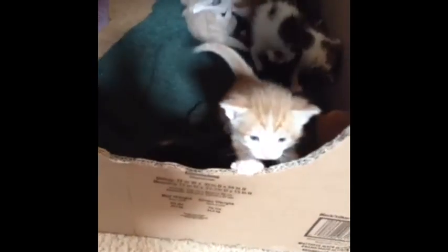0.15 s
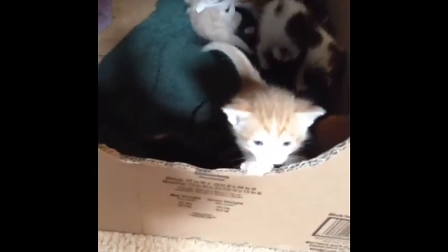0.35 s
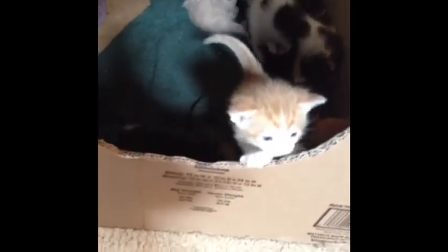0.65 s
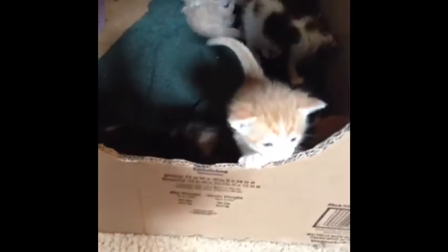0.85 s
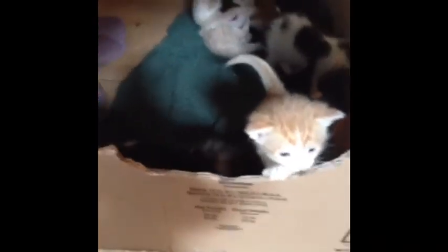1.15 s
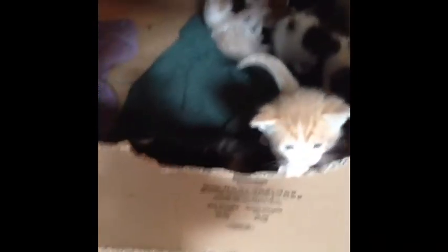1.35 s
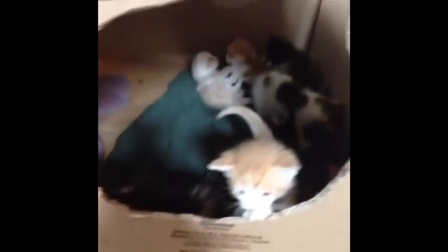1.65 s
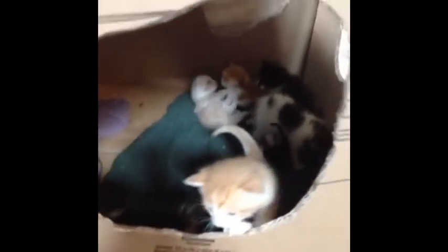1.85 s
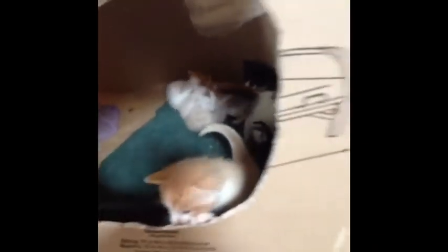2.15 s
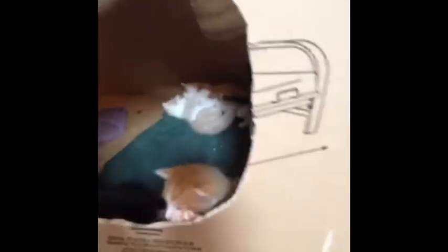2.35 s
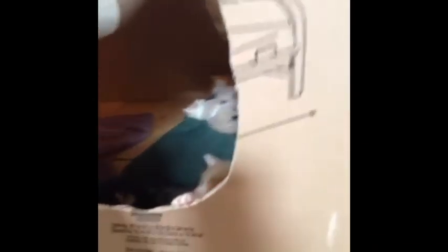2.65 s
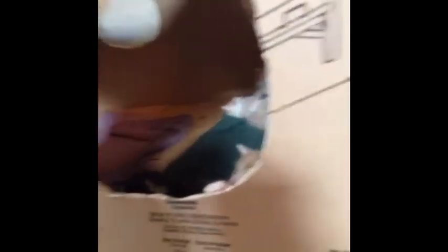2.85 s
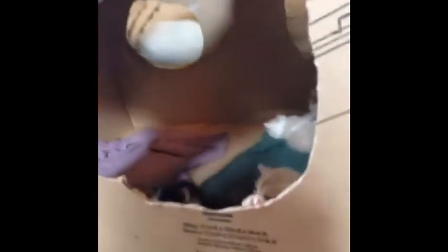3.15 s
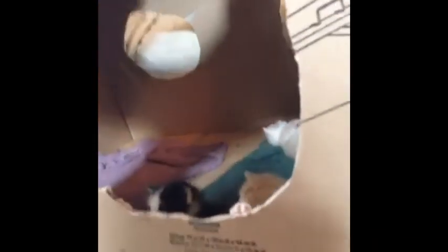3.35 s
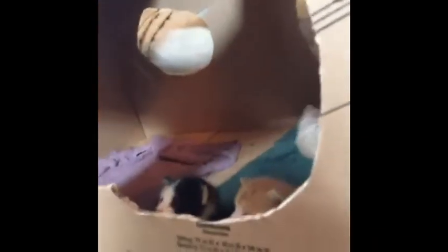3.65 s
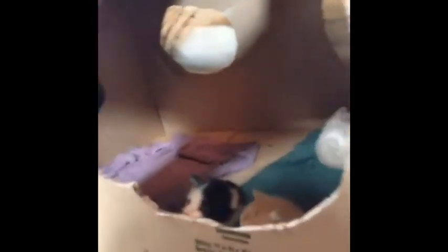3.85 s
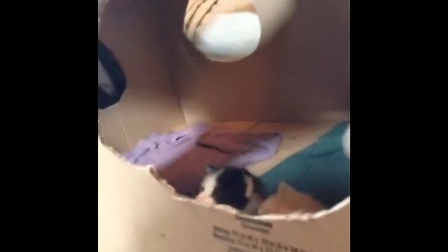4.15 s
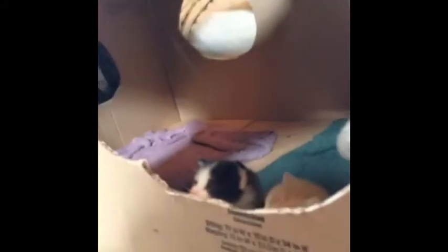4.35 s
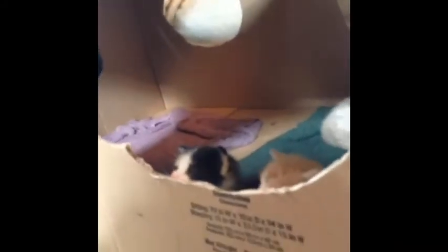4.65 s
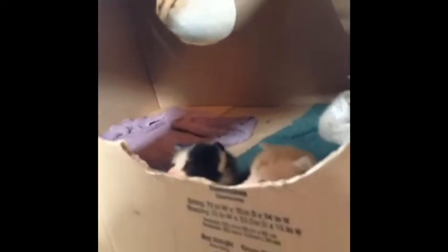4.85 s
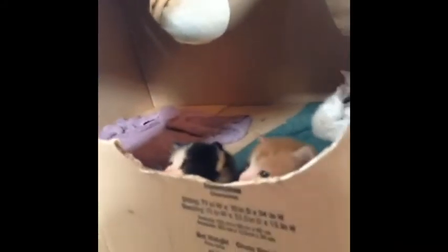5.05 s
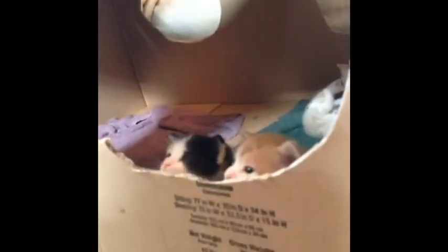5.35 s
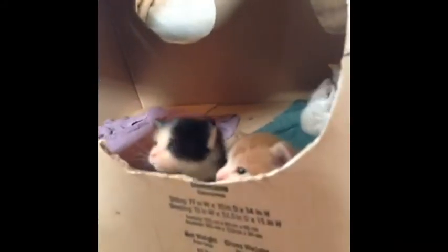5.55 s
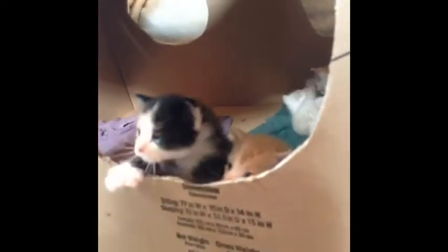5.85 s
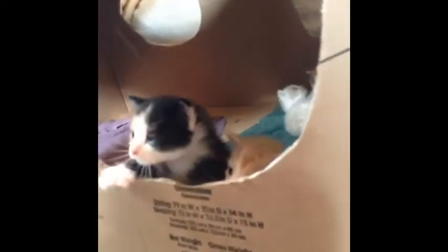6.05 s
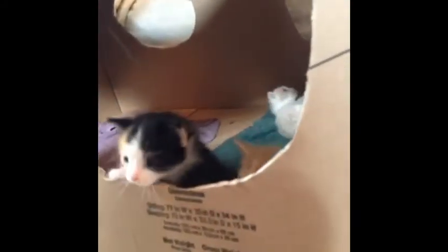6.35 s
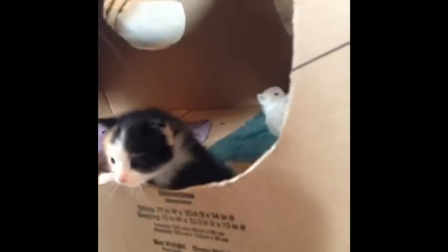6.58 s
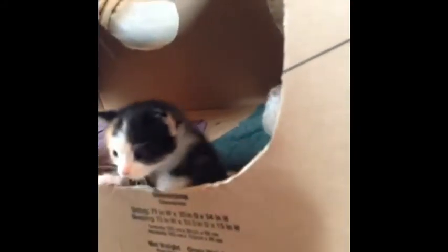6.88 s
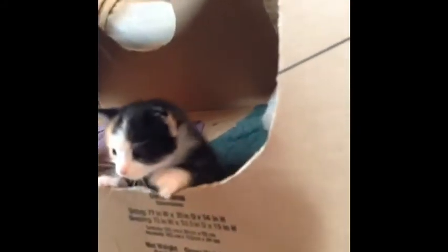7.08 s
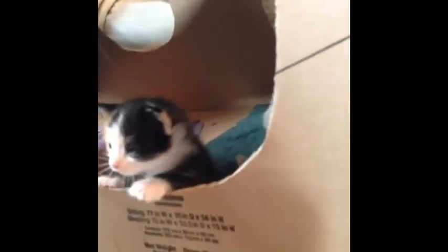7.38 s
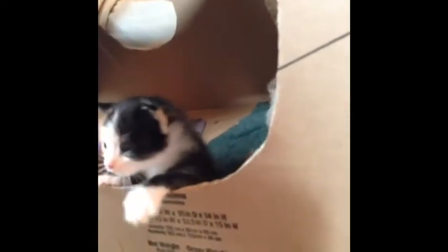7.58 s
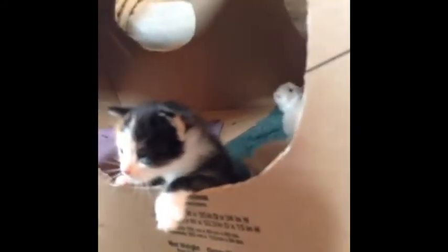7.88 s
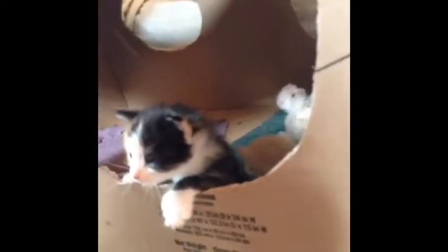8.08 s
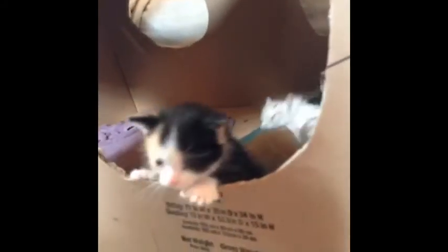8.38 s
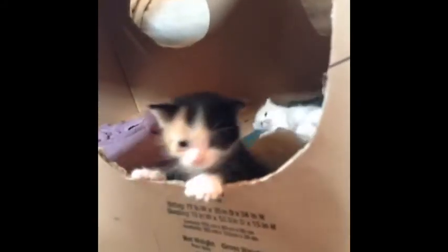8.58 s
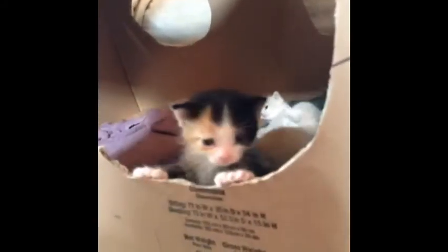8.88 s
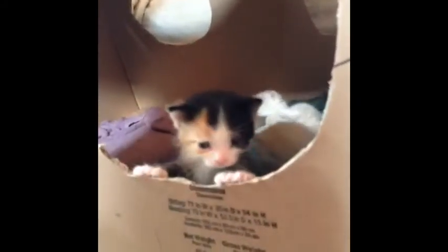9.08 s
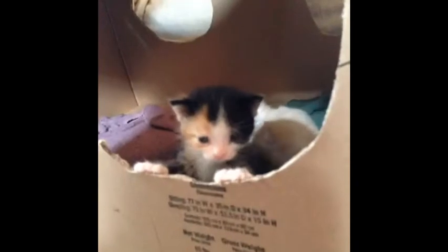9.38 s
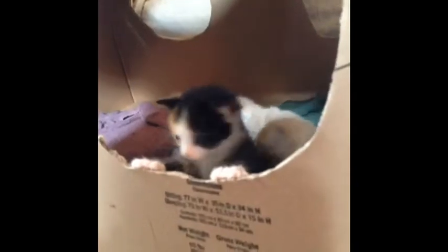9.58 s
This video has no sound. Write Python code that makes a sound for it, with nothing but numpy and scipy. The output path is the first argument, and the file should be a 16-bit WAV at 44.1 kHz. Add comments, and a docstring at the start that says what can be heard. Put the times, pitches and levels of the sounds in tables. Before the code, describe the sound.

Kittens clamber inside a cardboard box, claws scratching and ticking on the rim, with soft hollow bumps and two brief hissing slides.

```python
"""A faint stirring in a quiet room, then a close, dry scratch: kittens clamber about in a cardboard box.
Claws drag over the fibres, snap free, and knock and pluck at the rim; fur brushes past and paws bump
the walls. Twice something like a hand slides along the card, its hiss coloured by the air gap beneath.
Near the end a claw skips over the corrugations. The panels ring and the hollow of the box booms."""
import sys
import numpy as np
from scipy import signal
from scipy.fft import rfft, irfft, next_fast_len
from scipy.io import wavfile
from scipy.ndimage import uniform_filter1d, map_coordinates

SR = 44100
rng = np.random.default_rng(int(sys.argv[2]) if len(sys.argv) > 2 else 0)


def bounce(signal):
    """Save signal as a 16-bit WAV file at the path given by the first command-line argument."""
    frames = np.transpose(np.atleast_2d(signal))
    limited = np.clip(frames, -1, 1)
    pcm = np.round(limited * 32767).astype(np.int16)
    wavfile.write(sys.argv[1], SR, pcm)


N = 428652

# room tone and hiss: freq_hz, gain_db
ROOM_EQ = [(15, -72), (25, -27.5), (62, -16.5), (125, -4.5), (233, -1), (260, -9.5), (297, -9), (378, -6),
           (537, -4), (684, -6.5), (895, -8.5), (1050, -10.5), (2010, -11.5), (2360, -10), (5580, -10),
           (14300, -12.5), (15500, -16.5)]
# bodies stirring on the bedding; only the swing about the mean counts: time_s, stir_db
STIRRING = [(0.0, -74.5), (0.54, -78), (1.46, -70.5), (1.65, -72.5), (2.0, -76), (2.33, -69.5), (2.72, -71),
            (3.38, -75.5), (4.36, -69.5), (4.84, -67), (4.98, -73.5), (5.2, -70), (5.38, -64.5),
            (5.85, -69.5), (7.04, -69.5), (7.31, -68), (7.85, -72.5), (9.15, -67), (9.36, -71), (9.72, -72)]
# boom of the hollow box: freq_hz, gain_db
HOLLOW_EQ = [(40, -57.5), (95, -19), (135, -4), (168, 3.5), (235, -6), (290, -2.5), (360, -8.5), (430, -8),
             (600, -18), (1500, -65.5)]
# bending resonances of the panels: pitch_hz, width_hz, gain_db
PANEL_MODES = [(319, 78, 3), (434, 100, -1), (716, 45, 1.5), (946, 153, 1), (1208, 150, -4.5),
               (1970, 140, -6)]
# grit of a claw on fibres: freq_hz, gain_db
GRIT_EQ = [(500, -32), (1150, -1), (1480, -1.5), (1820, 4), (2250, 1), (3100, 3.5), (3750, 2.5), (4700, 2),
           (7500, -1.5), (10000, -6), (15000, -13)]
# claw strokes: start_s, length_s, grit_db, panel_db, hollow_db, attack_softness (0-1)
SCRATCH_CUES = [(.158, 0.016, -42.5, -49, -59, 0.05), (0.786, 0.037, -60, -68.5, -78, 0.9),
                (.928, 0.067, -56, -63.5, -66, 0.65), (1.014, 0.032, -63.5, -69, -63.5, 0.14),
                (1.157, 0.057, -60, -66.5, -68, 0.06), (1.257, 0.052, -63.5, -66, -61, 0.04),
                (1.361, 0.0693, -56, -63.5, -59.5, 0.87), (1.543, 0.0502, -54.5, -60.5, -65.5, 0.13),
                (1.63, 0.049, -53.5, -59.5, -66.5, 0.98), (1.733, 0.044, -62.5, -68.5, -74, 0.4),
                (2.064, .04, -70, -65, -62, 0.2), (3.552, 0.083, -59, -55.5, -58.5, 0.53),
                (4.35, 0.036, -66, -65.5, -62.5, .5), (4.418, 0.041, -58.5, -58.5, -57.5, 0.75),
                (4.536, 0.033, -63, -65, -64, 0.49), (4.619, 0.048, -60, -64, -62, 0.8),
                (4.698, 0.064, -63, -65, -64.5, 0.4), (4.768, 0.033, -63.5, -66, -61, 0.3),
                (4.802, 0.068, -62.5, -62, -59.5, 0.51), (4.953, .08, -60, -61.5, -61, 0.1),
                (5.139, 0.052, -55, -57, -58, 0.26), (5.268, 0.023, -67, -61.5, -64, .4),
                (5.331, 0.033, -63, -63, -61, 0.1), (5.36, 0.027, -53, -53, -58, 0),
                (5.378, .028, -56, -55, -58, .1), (5.422, .022, -63, -59, -56.5, .4),
                (5.653, 0.026, -67.5, -68, -63, 0.4), (5.451, 0.0192, -65.5, -55, -59, .03),
                (5.472, 0.03, -59, -52, -64, .45), (5.589, 0.014, -60, -53, -56.5, 0.06),
                (6.097, 0.022, -60, -60.5, -65, 0.1), (6.41, 0.06, -62, -69.5, -71, 0.4),
                (6.235, 0.034, -63, -66, -68, .3), (6.692, 0.013, -52, -60, -68, 0.1),
                (6.705, 0.021, -62, -65.5, -70, 0.1), (6.762, 0.017, -59, -66, -70, 0.3),
                (6.796, .014, -63, -70, -70, 0.4), (7.185, 0.00507, -53.5, -58, -59, .2),
                (7.258, 0.018, -59, -61, -59, .6), (7.313, 0.0076, -54, -56, -64, 0.1),
                (7.339, 0.017, -58, -59, -61, 0.05), (7.362, 0.017, -59, -60, -59, 0.2),
                (7.389, 0.014, -52.5, -51, -56, 0.5), (8.9532, 0.017, -50.5, -54.5, -67, 0.24),
                (8.518, .012, -66, -64, -71, .3), (9.04, 0.14, -71.5, -66, -69, 0.06),
                (9.198, 0.013, -65, -62, -61, .2), (9.232, .026, -72, -65, -62, 0.6)]
# fur against the rim: start_s, length_s, level_db
BRUSH_CUES = [(0.181, 0.084, -66), (5.879, 0.22, -67.5), (6.175, 0.091, -62.5), (6.553, .14, -64.5),
              (7.241, 0.3, -65), (7.878, 0.122, -64.5), (8.173, 0.16, -66), (8.489, 0.28, -62.5),
              (9.258, .036, -63), (9.318, 0.044, -60.5)]
# airy hiss of fur: freq_hz, gain_db
FUR_EQ = [(800, -4), (2500, -7.5), (5500, 0), (9000, -1.5), (15000, -4)]
# paws on the walls: start_s, level_db, hardness_hz
BUMP_CUES = [(.704, -49, 300), (1.269, -43, 352), (1.613, -50, 400), (2.38, -45.5, 300), (2.42, -45.5, 300),
             (2.478, -49, 300), (2.512, -50.5, 250), (2.545, -56, 300), (2.866, -56, 500),
             (2.997, -57.5, 500), (3.065, -57, 500), (3.650, -29, 620), (3.669, -41, 500),
             (4.221, -47, 250), (4.405, -54, 300), (4.488, -52, 300), (4.685, -55, 300), (4.76, -50, 350),
             (5.176, -50, 400), (5.485, -49.5, 450), (6.231, -47.5, 253), (6.655, -53.5, 300),
             (7.187, -49, 250), (7.394, -34, 195), (8.475, -54, 300), (8.80, -53, 250), (9.396, -43, 290),
             (9.405, -39, 230)]
# ring of the bumped box: pitch_hz, gain_db, t60_s
BOX_MODES = [(171.1, -1, 0.155), (197.6, -7.5, 0.12), (285, 1, 0.095), (427, 0, 0.037), (568, -7, 0.05),
             (707, -3, 0.037), (850, -0.5, 0.03), (1770, -12.5, .015)]
# claws snapping free: start_s, snap_peak_db, centre_hz, panel_relative_db
TICK_CUES = [(0.932, -42.5, 3940, -21), (1.1587, -43.5, 4340, -25), (2.4049, -31, 4500, -18),
             (3.6497, -31.5, 2100, 2.5), (3.7692, -38.5, 2600, -34), (4.002, -34, 3600, -35),
             (4.6275, -46, 4600, -8), (4.643, -45, 5000, -10), (4.7703, -42, 4500, -14),
             (4.955, -43, 3820, -18.5), (5.3955, -46, 5500, -5), (5.4853, -27.5, 7200, -29),
             (6.0417, -39.5, 4680, -8), (6.2423, -40, 4100, -16), (6.4459, -41, 3000, -25),
             (6.617, -39.5, 6160, -40), (7.061, -45.5, 1900, -13), (7.2524, -38.5, 5400, -16),
             (7.2915, -38, 6890, -15), (7.3132, -33.5, 5200, -9), (7.3395, -26, 7300, -18),
             (7.3915, -35.5, 1990, -10), (7.397, -34.5, 1800, -8), (7.8809, -40.5, 2900, -22),
             (8.5391, -36, 4500, -17), (8.6089, -41, 3800, -12), (8.765, -48.5, 1480, -10),
             (9.2663, -35.5, 4000, -15.5), (9.3183, -39, 3600, -9.5)]
# fader moves ahead of the trims, a list per slide: time_s, friction_db, fizz_relative_db, panel_db, hollow_db
SLIDE_FADERS = [
    [(2.06, -79, -13.5, -66, -68), (2.11, -52.5, -0.5, -72, -63), (2.164, -47.5, -2, -75.5, -62),
     (2.192, -46, -7, -75, -78), (2.258, -38, -10, -65, -74), (2.306, -42.5, -15, -61.5, -57),
     (2.34, -42, -11, -61, -64), (2.414, -41.5, -10, -55.5, -56), (2.446, -39, -8, -60, -52),
     (2.468, -37, -4, -55, -55), (2.494, -46.5, -7, -55, -54), (2.53, -85, -10, -72, -67)],
    [(3.78, -70, -4, -71, -76.5), (3.82, -59, 0, -79, -69), (3.872, -56, -4, -67, -76),
     (3.904, -37.5, -6, -70, -75), (3.952, -42, -7.5, -57, -78), (3.99, -45.5, -12, -64, -68),
     (4.036, -42, -15, -69, -69), (4.046, -36.5, -11, -72, -67), (4.09, -34.5, -4, -70, -63),
     (4.122, -33, -1.5, -63, -67), (4.16, -39.5, -8.5, -53.5, -59), (4.246, -58.5, -3, -56.5, -51.5),
     (4.305, -66, -4, -60.5, -59), (4.335, -74.5, -5.5, -70, -68)],
]
# skin rubbing on card: freq_hz, gain_db
FRICTION_EQ = [(400, -31), (1200, -2), (1500, -1), (2000, 1), (2600, 2), (3500, 2.5), (5000, 2),
               (6200, -0.5), (8300, -6), (9500, -22), (15000, -20)]
# fizzy top of the rub: freq_hz, gain_db
FIZZ_EQ = [(4000, -41), (7000, -5), (8300, 0), (9200, 1), (10300, -3), (11700, -7.5), (13000, -12.5),
           (15000, -15)]
# pitch of the air gap, rising as it shortens, a curve per slide: time_s, pitch_hz
GAP_GLIDES = [
    [(2.10, 1270), (2.16, 1360), (2.21, 1520), (2.26, 1810), (2.30, 2050), (2.345, 2560), (2.41, 3030),
     (2.445, 3750), (2.49, 4700)],
    [(3.80, 1080), (3.89, 1250), (3.95, 1480), (4.00, 1630), (4.055, 1800), (4.075, 1160), (4.11, 1150),
     (4.145, 1073), (4.30, 1130)],
]
# lowest band the gap passes, a curve per slide: time_s, band_hz
GAP_LOW_BANDS = [
    [(2.12, 1900), (2.175, 2350), (2.225, 1680), (2.32, 1660), (2.46, 1310)],
    [(3.89, 1750), (3.965, 1620), (3.992, 2950), (4.033, 3220), (4.048, 2390), (4.135, 2150), (4.15, 1240),
     (4.3, 1110)],
]
# claws and paws landing on the cut rim: start_s, level_db
KNOCK_CUES = [(2.768, -59), (2.867, -54.5), (3.035, -60), (3.066, -53.5), (4.438, -52), (4.627, -53.5),
              (5.454, -51), (5.478, -51), (3.6507, -37), (7.1857, -53), (7.3132, -41.5), (7.3396, -40.5)]
# ring of the stiff rim: pitch_hz, gain_db, t60_s
RIM_MODES = [(296, -5.5, .05), (441, 1, 0.033), (554, -1.5, .028), (827, -3.5, 0.043), (980, -1.5, .025),
             (1150, -4.5, 0.022)]
# claws plucking a stiff edge: start_s, peak_db, pitch_hz
PLUCK_CUES = [(3.6499, -27.5, 6600), (5.1645, -38.5, 6700), (6.418, -45, 5500), (6.4295, -47, 5600),
              (6.4456, -32.5, 6000), (6.451, -45, 5400), (6.4583, -37, 5050), (6.4635, -44, 5300),
              (7.3135, -41, 4500), (7.3405, -35.5, 4480)]


def amp(db):
    """Decibels to gain."""
    return 10 ** (np.asarray(db) / 20)


def unit(x):
    """x at rms 1."""
    return x / np.sqrt(np.mean(np.abs(x) ** 2) + 1e-20)


def eq(points, hz):
    """Gain of an EQ curve, drawn on a log frequency axis."""
    freq_hz, gain_db = np.transpose(points)
    return amp(np.interp(np.log(hz + 1), np.log(freq_hz), gain_db))


def curves(rows, t):
    """Each column after the time, read at the times t."""
    time_s, *columns = np.transpose(rows)
    return [np.interp(t, time_s, column) for column in columns]


def wobble(rate, n):
    """A smooth random curve, rate knots a second."""
    return map_coordinates(rng.standard_normal(int(n * rate / SR) + 4), [np.arange(n) * rate / SR])


def add(track, start_s, x):
    """Mix x into the track at start_s."""
    part = track[max(round(start_s * SR), 0):][:len(x)]
    part += x[:len(part)]


def colour(x, gain, tail=4096):
    """Minimum-phase filter of unit energy, shaped by gain(hz); keeps the ring-out."""
    size = 2 * next_fast_len((len(x) + tail) // 2)
    cepstrum = irfft(np.log(unit(gain(np.fft.rfftfreq(size, 1 / SR))) + 1e-6))
    cepstrum[1:size // 2] *= 2
    cepstrum[size // 2 + 1:] = 0
    return irfft(rfft(x, size) * np.exp(rfft(cepstrum)))


def resonance(hz, centre, width):
    """Gain of one resonance, 1 at its centre."""
    return hz * width / np.hypot(centre ** 2 - hz ** 2, hz * width)


def room(level_db=-65):
    """A steady bed of low room tone and hiss."""
    return amp(level_db) * colour(rng.standard_normal(N), lambda hz: eq(ROOM_EQ, hz))[:N]


def grains(n, rate, spread_db):
    """Fibres catching and letting go: random impulses of uneven size, rms 1."""
    caught = rng.random(n) < rate / SR
    return unit(caught * rng.choice([-1, 1], n) * amp(spread_db * np.clip(rng.standard_normal(n), -2, 2)))


def hollow(hz):
    """Gain of the whole box booming."""
    return eq(HOLLOW_EQ, hz)


def panel(hz):
    """Gain of the cardboard's bending resonances, with the mids forward."""
    power = sum((amp(db) * resonance(hz, centre, width)) ** 2 for centre, width, db in PANEL_MODES)
    tone = eq([(150, -25.5), (500, -3), (1200, 2.0), (1500, -5.0), (2000, -8.5), (4000, -7.5)], hz)
    return np.sqrt(power) * tone


def shuffle(base_db=-70, swing=1.18):
    """Small bodies shift on the bedding and keep the box murmuring with faint crackles."""
    stir_db, = curves(STIRRING, np.arange(N) / SR)
    fidget = amp(3 * wobble(14, N))
    crackle = amp(swing * (stir_db - stir_db.mean())) * fidget * grains(N, rate=700, spread_db=4)
    body = lambda hz: (amp(-3) * unit(hollow(hz)) + amp(-13.5) * unit(panel(hz))
                       + amp(-10) * unit(eq(GRIT_EQ, hz)))
    return amp(base_db) * colour(crackle, body)[:N]


def spot(depth_db, spacing_hz):
    """Every spot of the card has its own uneven resonances: a random EQ curve."""
    knots = depth_db * rng.standard_normal(int(SR / 2 / spacing_hz) + 4)
    return lambda hz: amp(map_coordinates(knots, [hz / spacing_hz], order=1))


def snags(n, per_s=220, decay_s=0.00097, spike_db=3):
    """The claw catches and tears free: brief random spikes on top of unity gain."""
    caught = rng.random(n) < per_s / SR
    return 1 + amp(spike_db) * signal.lfilter([1], [1, -np.exp(-1 / (decay_s * SR))], caught)


def scratches(strokes, rasp_hz=4570, rasp_scatter=0.054, rasp_gain=0.52):
    """A claw drags in jerks over the fibres, rasping and shaking the panel and the box."""
    out = np.zeros(N)
    for start_s, length_s, grit_db, panel_db, hollow_db, softness in strokes:
        n = int(length_s * SR)
        progress = np.arange(n) / n
        envelope = progress ** softness * (1 - progress) ** 0.83
        jerks = amp(2.5 * wobble(254, n)) * snags(n)
        drag = unit(envelope * jerks * grains(n, rate=5500, spread_db=4))
        card = spot(depth_db=3.2, spacing_hz=200)
        peak_hz = rasp_hz * np.exp(rasp_scatter * rng.standard_normal())
        bite = lambda hz: 1 + rasp_gain * resonance(hz, peak_hz, 0.12 * peak_hz)
        rasp = colour(drag, lambda hz: card(hz) * eq(GRIT_EQ, hz) * bite(hz))
        add(out, start_s, amp(grit_db) * rasp + amp(panel_db) * colour(drag, panel))
        add(out, start_s, amp(hollow_db) * colour(drag, hollow))
    return out


def brushes():
    """Fur grazes the rim in a smooth, airy swell."""
    out = np.zeros(N)
    for start_s, length_s, level_db in BRUSH_CUES:
        n = int(length_s * SR)
        swell = unit(np.sqrt(np.abs(np.hanning(n)))) * rng.standard_normal(n)
        add(out, start_s, amp(level_db) * colour(swell, lambda hz: eq(FUR_EQ, hz)))
    return out


def bumps(crumple_db=-3.5, crumple_t60=0.07):
    """A padded paw rings the box; the softer the contact, the fewer high modes."""
    out, t = np.zeros(N), np.arange(SR // 3) / SR
    for start_s, level_db, hardness_hz in BUMP_CUES:
        padded = lambda hz: 1 / np.hypot(1, (hz / hardness_hz) ** 2)
        scatter_db = rng.normal(0, 1.5, len(BOX_MODES))
        ring = sum(amp(db + extra_db - 60 * t / t60) * padded(hz) * np.sin(2 * np.pi * hz * t)
                   for (hz, db, t60), extra_db in zip(BOX_MODES, scatter_db))
        muffled = lambda hz: resonance(hz, hardness_hz / 2, hardness_hz) * padded(hz)
        crumple = colour(rng.standard_normal(len(t)), muffled)[:len(t)]
        crumple *= amp(crumple_db - 60 * t / crumple_t60)
        attack = 1 - np.exp(-t * hardness_hz)  # the pad flattens gradually
        add(out, start_s, amp(level_db) * attack * (ring + crumple))
    return out


def low_cut(x, cutoff_hz=138):
    """A low cut takes the deep bass out of the bumps."""
    return signal.sosfilt(signal.butter(4, cutoff_hz, "high", fs=SR, output="sos"), x)


def ticks(t60=0.006, ring_db=-30, ring_t60=0.053, dull_hz=10500):
    """A claw pops free of the fibres: a dry snap with a brief ring in the card."""
    out, t = np.zeros(N), np.arange(SR // 20) / SR
    for start_s, peak_db, centre_hz, panel_db in TICK_CUES:
        burst = rng.standard_normal(len(t)) * (amp(-60 * t / t60) + amp(ring_db - 60 * t / ring_t60))
        card = spot(depth_db=2, spacing_hz=350)
        band = lambda hz: resonance(hz, centre_hz, 1.03 * centre_hz) / np.hypot(1, (hz / dull_hz) ** 2)
        snap = colour(burst, lambda hz: card(hz) * band(hz))
        body = colour(burst, panel)
        tick = snap / np.abs(snap).max() + amp(panel_db) * body / np.abs(body).max()
        add(out, start_s, amp(peak_db) * tick)
    return out


def air_gap(x, start_s, glide, low_band, comb_db=3.5, comb_fade_hz=7500, whistle_hz=3400, leak=0.23):
    """The gap under the hand rings at multiples of a gliding pitch and thins out below its lowest band."""
    hz, t, spectrum = signal.stft(x, SR, nperseg=512, noverlap=384)
    hz = hz[:, None]
    pitch_hz, = curves(glide, start_s + t)
    low_hz, = curves(low_band, start_s + t)
    band_ratio = hz / low_hz + 1e-3
    comb = amp(comb_db * np.cos(2 * np.pi * hz / pitch_hz) / np.hypot(1, hz / comb_fade_hz))
    # minor, uneven resonances glide half as far
    minor = spot(depth_db=3, spacing_hz=169)(hz * np.sqrt(pitch_hz.min() / pitch_hz))
    # the higher the lowest band, the more it whistles; at whistle_hz its gain doubles
    whistle = 1 + (low_hz / whistle_hz) ** 2 * np.exp(-((band_ratio - 1) / .15) ** 2)
    low_shelf = leak + (1 - leak) / (1 + (.88 / band_ratio) ** 20)
    patches = uniform_filter1d(rng.standard_normal(spectrum.shape), size=3, axis=0)
    ragged = amp(2.2 * unit(uniform_filter1d(patches, size=14, axis=1)))  # patchy rubbing contact
    spectrum *= comb * minor * whistle * low_shelf * ragged
    return unit(signal.istft(spectrum, SR, nperseg=512, noverlap=384)[1][:len(x)])


def slides(fizz_trim_db=-0.2, panel_trim_db=-0.5, hollow_trim_db=-3):
    """Skin sweeps over cardboard: dense juddering grains, coloured by the moving gap."""
    out = np.zeros(N)
    for faders, glide, low_band in zip(SLIDE_FADERS, GAP_GLIDES, GAP_LOW_BANDS):
        start_s, end_s = faders[0][0], faders[-1][0]
        n = int((end_s - start_s) * SR)
        friction_db, fizz_db, panel_db, hollow_db = curves(faders, start_s + np.arange(n) / SR)
        judder = unit(amp(1.3 * wobble(492.5, n)))
        rub = lambda: judder * grains(n, rate=16000, spread_db=2.5)
        hiss = lambda tone: air_gap(colour(rub(), lambda hz: eq(tone, hz))[:n], start_s, glide, low_band)
        friction = hiss(FRICTION_EQ) + amp(fizz_db + fizz_trim_db) * hiss(FIZZ_EQ)
        add(out, start_s, amp(friction_db) * friction)
        add(out, start_s, colour(amp(panel_db + panel_trim_db) * rub(), panel))
        add(out, start_s, colour(amp(hollow_db + hollow_trim_db) * rub(), hollow))
    return out


def knocks(attack_s=0.00043):
    """A claw or paw lands on the rim, which answers with a short, hollow tock."""
    out, t = np.zeros(N), np.arange(SR // 10) / SR
    for start_s, level_db in KNOCK_CUES:
        phases = rng.uniform(0, 2 * np.pi, len(RIM_MODES))
        ring = sum(amp(db - 60 * t / t60) * np.sin(2 * np.pi * hz * t + phase)
                   for (hz, db, t60), phase in zip(RIM_MODES, phases))
        add(out, start_s, amp(level_db) * (1 - np.exp(-t / attack_s)) * ring)
    return out


def plucks(t60=0.013, relative_width=0.186, grit_db=-21):
    """A claw plucks a stiff edge: a bright, pitched snap from one narrow resonance."""
    out, t = np.zeros(N), np.arange(SR // 30) / SR
    for start_s, peak_db, pitch_hz in PLUCK_CUES:
        burst = rng.standard_normal(len(t)) * amp(-60 * t / t60)
        edge = lambda hz: resonance(hz, pitch_hz, relative_width * pitch_hz) ** 2
        snap = colour(burst, lambda hz: edge(hz) + amp(grit_db) * eq(GRIT_EQ, hz))
        add(out, start_s, amp(peak_db) * snap / np.abs(snap).max())
    return out


def skips(start_s=8.9861, gap_s=0.0086, length_s=0.0088, ridges=6, hollow_db=-69, softness=0.214):
    """Scratch cues for a claw skipping over ridges: it bites deepest at the second, then loses grip."""
    strokes = []
    for ridge in range(ridges):
        from_bite = abs(ridge - 1)
        grit_db, panel_db = -48 - 3.5 * from_bite, -56 - from_bite
        strokes.append((start_s + ridge * gap_s, length_s, grit_db, panel_db, hollow_db, softness))
    return strokes


def reverb(x, t60=0.23, wet_db=-17):
    """The box and the room add a short, faint tail."""
    t = np.arange(SR // 3) / SR
    tail = rng.standard_normal(len(t)) * amp(-60 * t / t60) * (t > .002)
    return x + amp(wet_db) * signal.fftconvolve(x, tail / np.linalg.norm(tail))[:N]


def scene():
    """Everything that touches the box, over the stirring and the quiet room, in mono."""
    claws = scratches(SCRATCH_CUES + skips()) + ticks() + plucks() + knocks()
    touches = claws + low_cut(bumps()) + slides() + brushes()
    return (reverb(touches) + shuffle() + room())[None]


def record(dry, top_hz=15550):
    """A brick-wall high cut on the mix."""
    size = next_fast_len(N + SR // 2)
    passband = np.fft.rfftfreq(size, 1 / SR) < top_hz
    return irfft(rfft(dry, size) * passband, size)[..., :N]


dry = scene()
out = record(dry)
bounce(out)
```